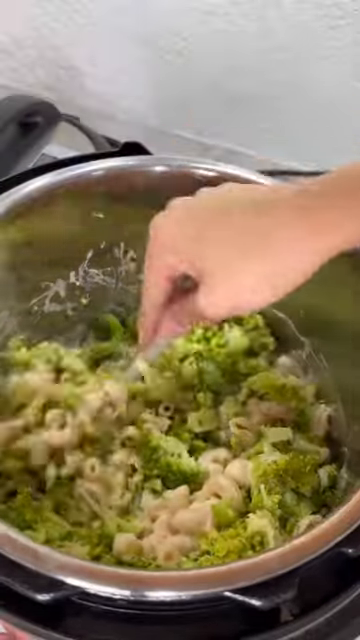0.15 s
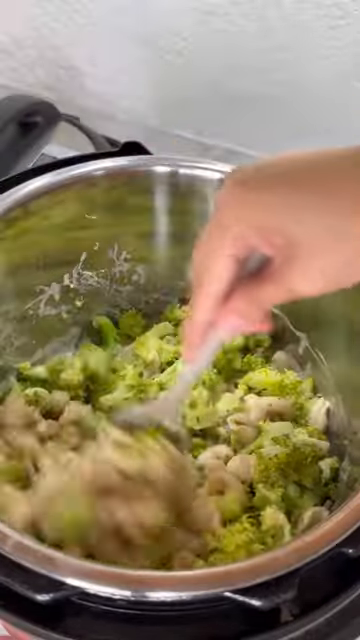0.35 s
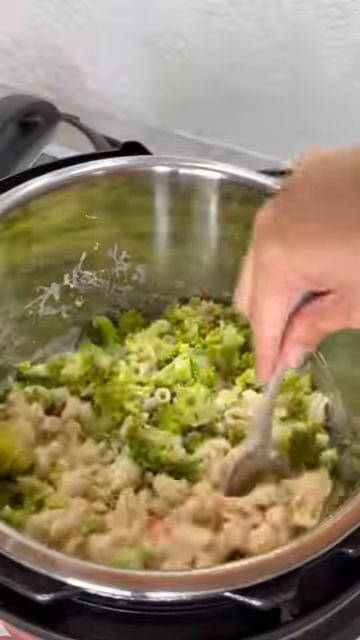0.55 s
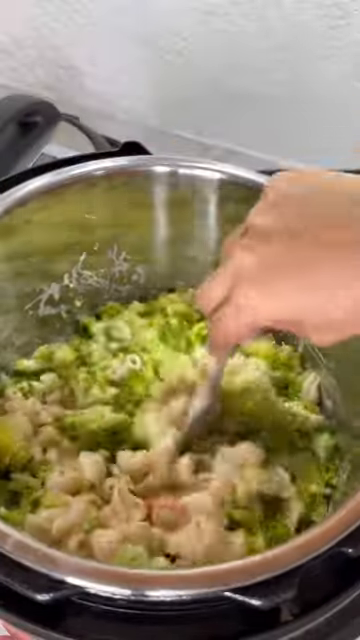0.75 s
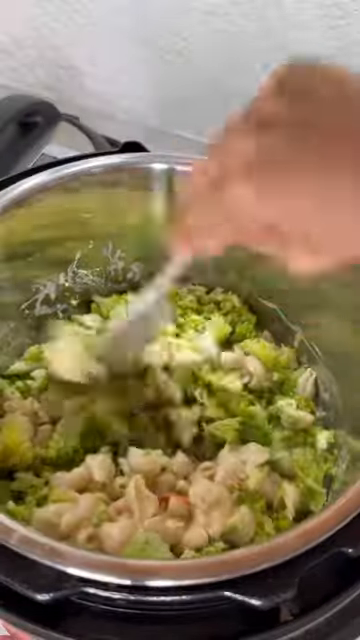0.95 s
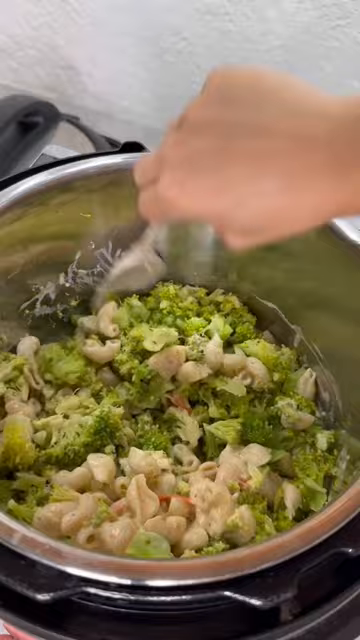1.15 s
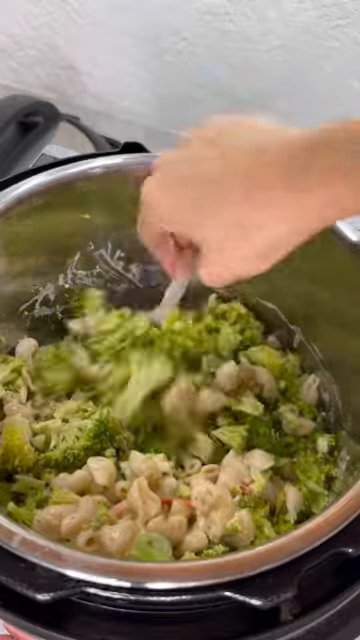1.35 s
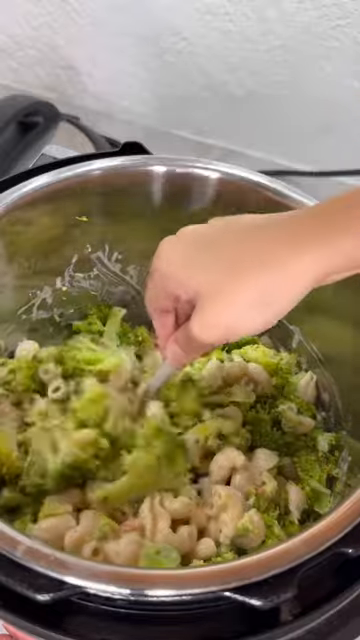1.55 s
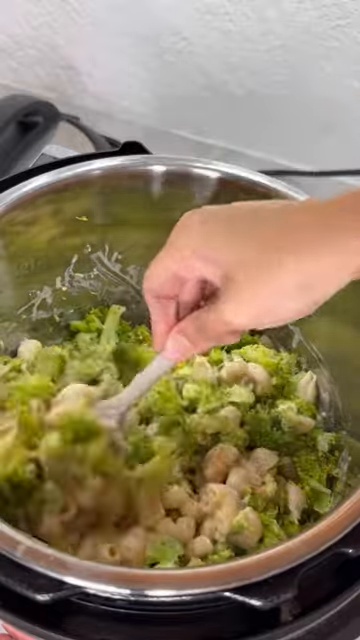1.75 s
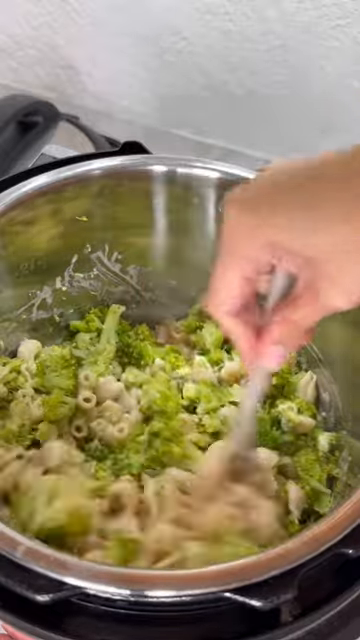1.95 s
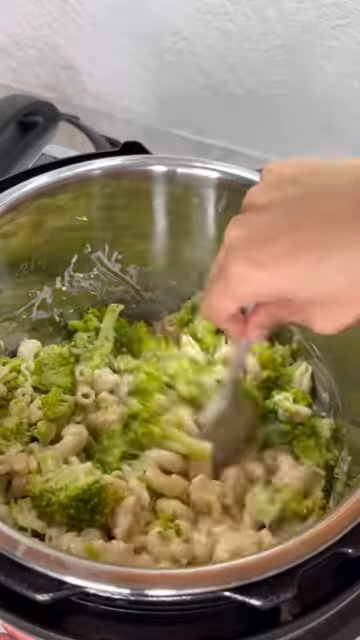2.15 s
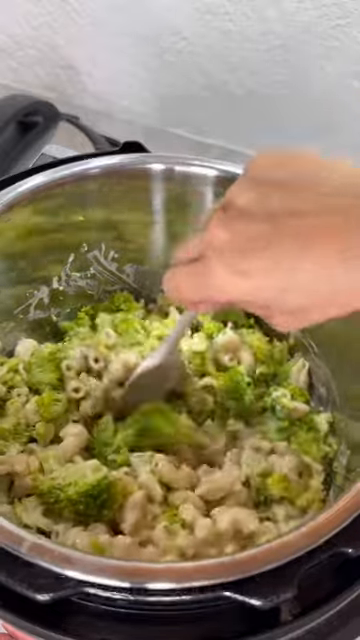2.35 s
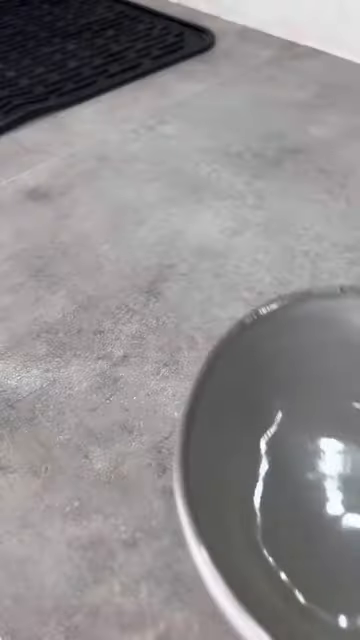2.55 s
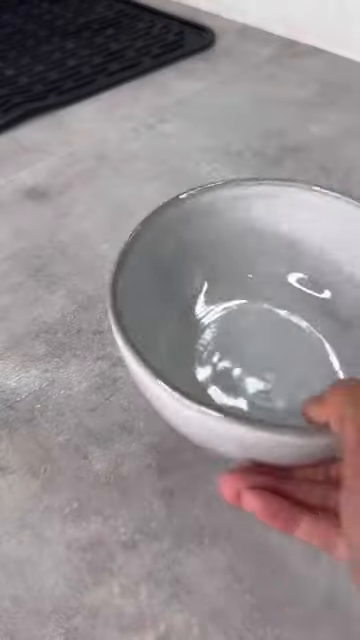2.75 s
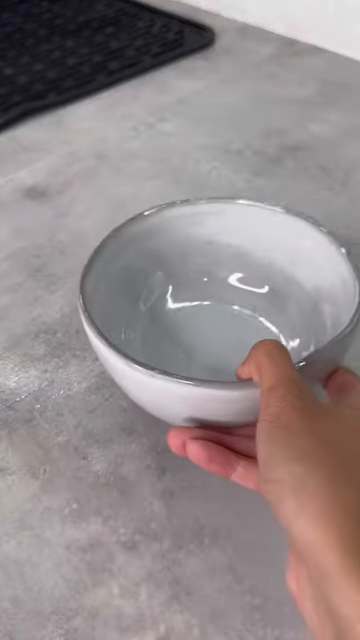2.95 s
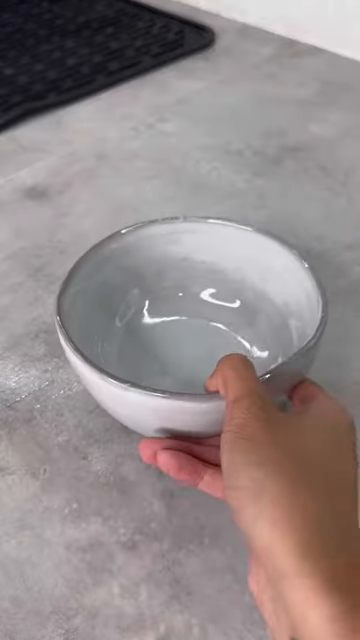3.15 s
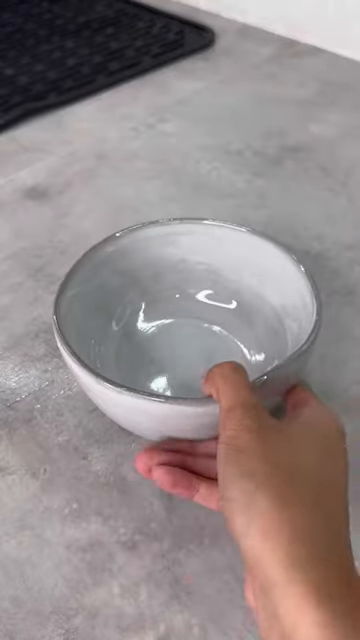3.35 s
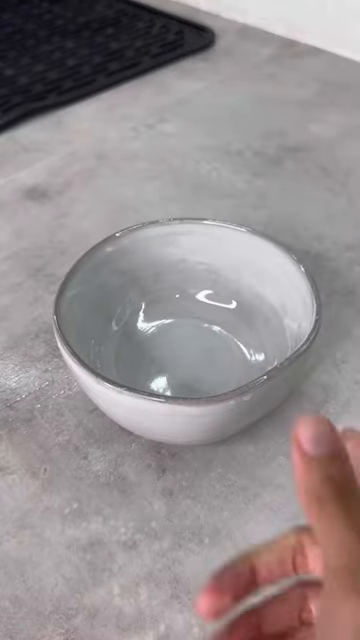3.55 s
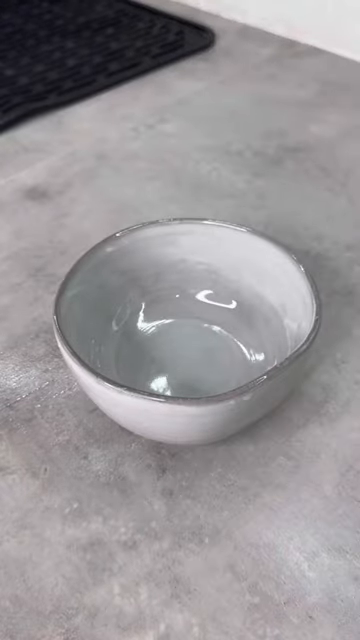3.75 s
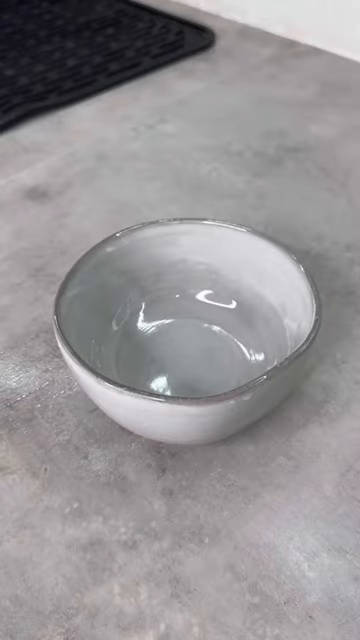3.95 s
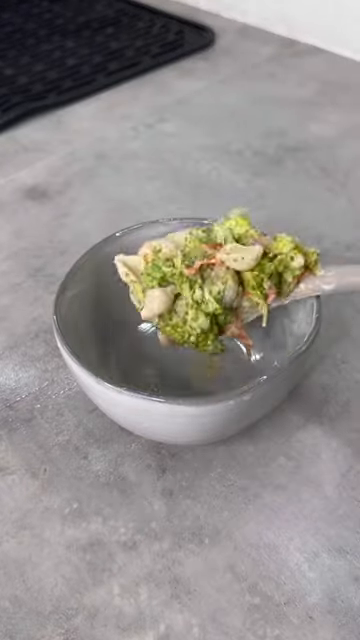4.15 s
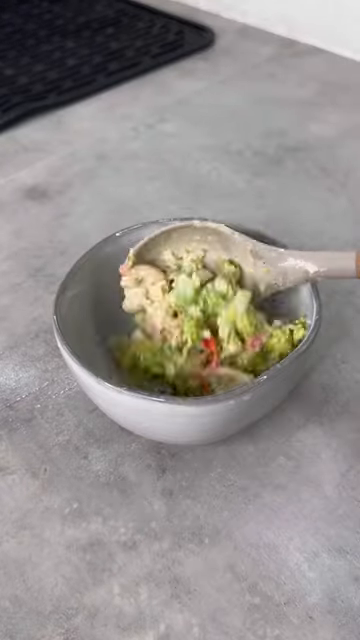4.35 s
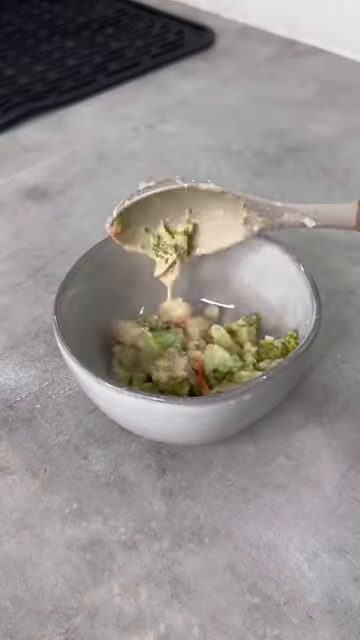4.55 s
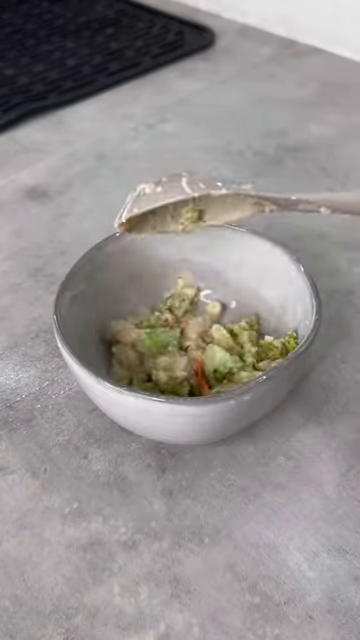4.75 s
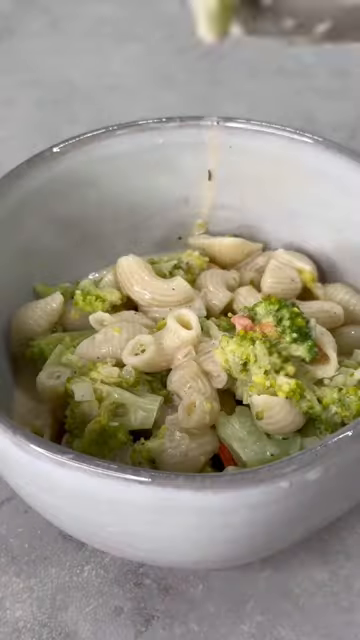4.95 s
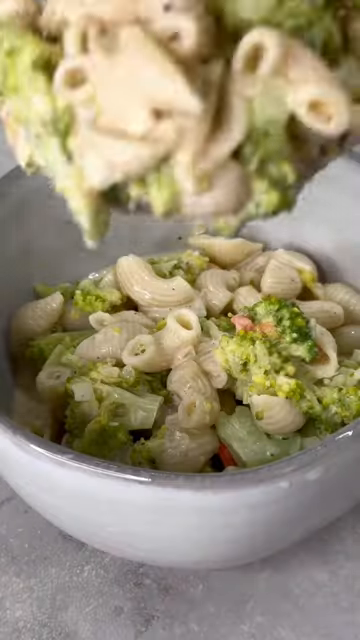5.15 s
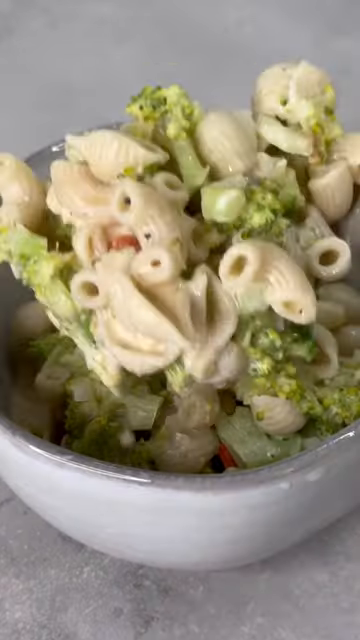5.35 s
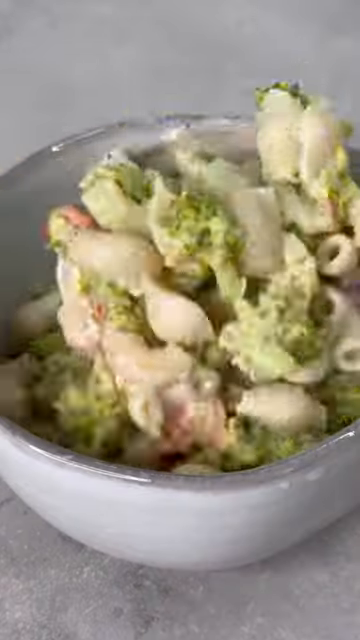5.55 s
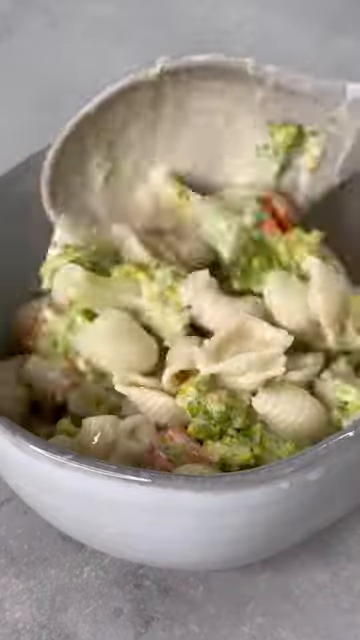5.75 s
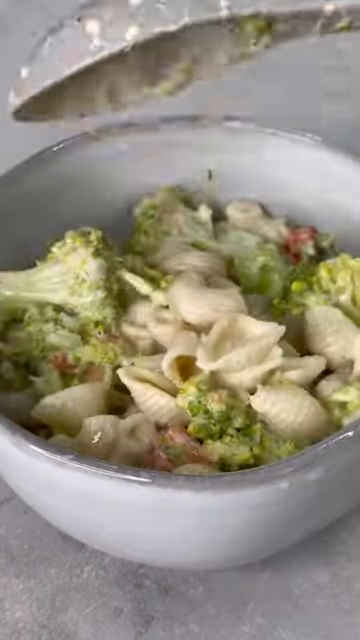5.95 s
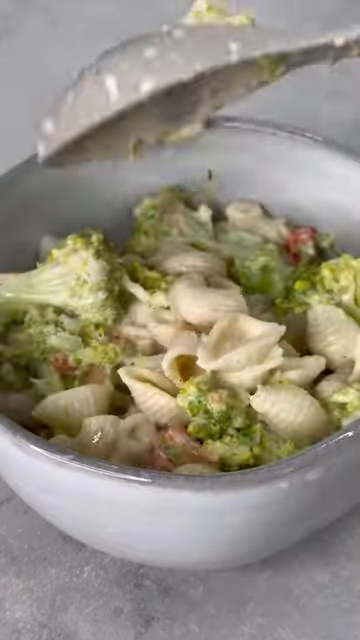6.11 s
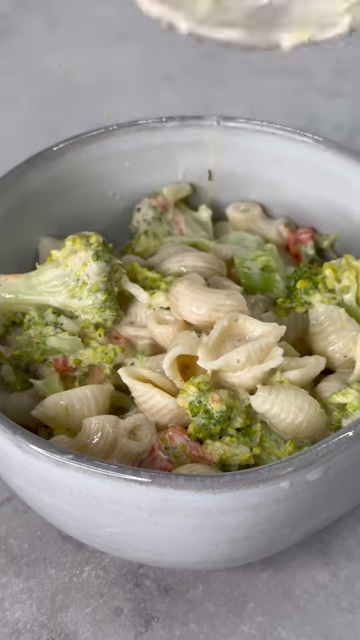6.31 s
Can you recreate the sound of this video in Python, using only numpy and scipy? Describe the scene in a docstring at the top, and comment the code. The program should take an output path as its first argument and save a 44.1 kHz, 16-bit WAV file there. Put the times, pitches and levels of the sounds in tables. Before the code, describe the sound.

Wet, sticky stirring in a metal pot, a loud knock of a bowl set down, then soft plops of pasta being served.

```python
"""Stirring and serving creamy pasta

Close to a steel pot in a kitchen, on a stereo microphone. A spoon turns the pasta: the sauce crackles
and pops, the spoon thumps the pot and skids on its wall. A ceramic bowl is set down on the counter
with a loud knock, then two spoonfuls plop softly into it."""
import sys
import numpy as np
from scipy import signal
from scipy.fft import rfft, irfft
from scipy.io import wavfile

SR = 44100
rng = np.random.default_rng(int(sys.argv[2]) if len(sys.argv) > 2 else 0)


def dump(signal):
    """Clip the signal to [-1, 1] and save it as 16-bit WAV at the path in sys.argv[1]."""
    limited = np.clip(np.atleast_2d(signal).T, -1, 1)
    pcm = np.round(limited * 32767).astype(np.int16)
    wavfile.write(sys.argv[1], SR, pcm)


N = 285674
TIME = np.arange(N) / SR
CUTOFF_HZ = 16200

# The spoon pushing through the pot. Each row: hardest moment in seconds, relative squelch and fizz
# levels in dB, swell and fade in seconds.
PUSHES = [(0.03, -64, -67.5, 0.2, 0.29), (0.39, -72, -73.5, 0.1, 0.09), (0.8, -57.5, -64, 0.21, 0.056),
          (1.16, -66.5, -72, 0.052, 0.068), (1.38, -65, -72.5, 0.11, 0.18), (1.89, -68.5, -69, 0.32, 0.38),
          (2.17, -56, -62.5, 0.082, 0.074), (2.47, -76, -79, 0.21, 0.0083)]
# Pasta sliding off the spoon and settling in the bowl. Rows as in PUSHES.
SPOONFULS = [(4.3, -64, -60, 0.033, 0.061), (4.4, -63, -66, 0.079, 0.12), (5.38, -69.5, -61, 0.031, 0.037),
             (5.52, -64.5, -67, 0.034, 0.063), (5.73, -73, -68.5, 0.093, 0.24)]
# Larger air pockets opening in the sauce. Each row: start in seconds, relative level in dB, pitch in Hz,
# swell in cycles, relative spray level in dB.
AIR_POCKETS = [(0.019, -48, 4380, 4.7, -60), (0.027, -50.5, 5670, 2.37, -53), (0.095, -53, 3200, 2.2, -73),
               (0.144, -48, 3730, 3.2, -56), (0.2751, -40, 1416, 1.4, -68), (0.282, -38, 5170, 0.64, -68),
               (0.32, -46.5, 1800, 0.48, -82), (0.349, -54, 8000, 0.7, -58),
               (0.4123, -41.5, 3400, 1.3, -62), (0.4682, -42.5, 1360, 1.36, -65.5),
               (0.5066, -47.5, 2354, 2.23, -65), (0.524, -43, 3680, 0.86, -74),
               (0.549, -44.5, 1880, 0.81, -80), (0.564, -50, 5520, 4.4, -53.5),
               (0.6226, -28.5, 2880, 1.3, -60), (0.6583, -39.5, 2490, 1.4, -53),
               (0.7205, -28.5, 2020, 0.43, -46.5), (0.7538, -42, 3330, 0.8, -56),
               (0.7715, -28, 3610, 0.6, -49), (0.922, -41, 9250, 1.3, -68), (1.154, -44, 2810, 3.2, -55),
               (1.2502, -46.5, 2110, 0.48, -78), (1.2884, -35.5, 3040, 0.82, -53.5),
               (1.2958, -32.5, 5200, 0.65, -64), (1.307, -41.5, 2300, 0.85, -63),
               (1.4315, -41, 2200, 0.62, -76), (1.452, -40, 1970, 0.86, -79), (1.506, -48, 3000, 0.89, -69),
               (1.5518, -47.5, 2450, 1.12, -72), (1.6339, -28.5, 1700, 0.43, -58),
               (1.6933, -41, 1860, 1.2, -52), (1.7427, -41.5, 9980, 3.8, -68),
               (1.783, -42.5, 3070, 1.4, -60), (1.819, -45, 2940, 1.2, -70), (1.8555, -47, 3960, 1.6, -69),
               (2.103, -40.5, 3200, 0.54, -66), (2.1442, -34, 3360, 2.4, -61),
               (2.1713, -43.5, 3640, 1.4, -59), (2.223, -45, 1960, 1.2, -62.5),
               (2.251, -47.5, 3230, 1.07, -58.5), (2.314, -43, 2270, 1.3, -60),
               (2.4505, -49.5, 3450, 2.7, -79), (2.4888, -45, 3100, 1.7, -60.5),
               (4.2426, -58.5, 2810, 4.3, -82), (4.2845, -23, 9530, 2, -53.5),
               (4.3569, -36, 8950, 1.22, -72), (4.4398, -45.5, 3152, 2, -76),
               (4.5216, -41.5, 1640, 1.3, -67), (4.5569, -54.5, 3820, 1.4, -68),
               (4.683, -49, 2000, 0.61, -70), (4.69, -27.5, 14380, 5, -64),
               (4.6907, -27.5, 1480, 0.29, -68), (4.6927, -45, 5080, 3.9, -76),
               (4.709, -43, 5780, 2.8, -67), (5.288, -52, 3735, 2.8, -79), (5.4292, -56.5, 2225, 1.5, -74),
               (5.4866, -52.5, 1760, 0.98, -62.5), (5.528, -54, 3500, 2, -73),
               (5.5422, -50, 2485, 1.7, -71), (5.554, -52.5, 5770, 1.8, -62.5),
               (5.6065, -53, 4700, 2.6, -70), (5.64, -45, 2506, 2.1, -72), (5.722, -50, 6000, 1.16, -60.5),
               (5.8335, -48.5, 4200, 2.3, -62), (5.6525, -39.5, 14000, 2.4, -58),
               (5.8843, -33.5, 13840, 1.8, -63.5)]
# Modes of the glazed bowl. Each row: pitch in Hz, level in dB, T60 in seconds.
BOWL_MODES = [(1083, -29, .75), (1182, -25.5, .4), (1275, -19.5, 0.3), (4540, -42, .45), (5280, -26, 0.2),
              (6070, -27, 0.15), (7250, -32.5, 0.22)]


def from_db(db):
    """Decibels to gain."""
    return 10 ** (np.asarray(db) / 20)


def unit_rms(x):
    """Scale to unit power."""
    return x / np.sqrt(np.mean(x ** 2) + 1e-20)


def at_hz(points, hz):
    """Read a curve on a log-frequency axis."""
    freqs, values = np.transpose(points)
    return np.interp(np.log(np.maximum(hz, 1)), np.log(freqs), values)


def colour(x, spectrum):
    """Shape a signal by a spectrum in dB."""
    gain = from_db(at_hz(spectrum, np.arange(N + 1) * SR / (2 * N)))
    return irfft(rfft(x, 2 * N) * gain)[..., :x.shape[-1]]


def add(out, start_s, sound):
    """Mix a sound in at its start time."""
    i = max(round(start_s * SR), 0)
    out[i:i + len(sound)] += sound[:N - i]


def ring(x, modes):
    """Drive damped modes: a unit click sets each one ringing at its level."""
    out = 0
    for k, (hz, db, t60) in enumerate(modes):
        radius, angle = from_db(-60 / (t60 * SR)), 2 * np.pi * hz / SR
        mode = signal.lfilter([0, np.sin(angle)], [1, -2 * radius * np.cos(angle), radius ** 2], x + 1e-18)
        out += (-1) ** k * from_db(db) * mode
    return out


def boom(modes, swell_cycles):
    """A struck plate: bending waves are slow in the bass, so lower modes take longer to swell."""
    t, out = TIME[:SR], 0
    for k, (hz, db, t60) in enumerate(modes):
        swell = 1 - np.exp(-(t * hz / swell_cycles) ** 2)
        out += (-1) ** k * swell * from_db(db - 60 * t / t60) * np.sin(2 * np.pi * hz * t)
    return out


def burst(low_hz, high_hz, decay_s):
    """A dying spurt of noise within a band."""
    t = TIME[:SR // 4]
    band = signal.butter(2, [low_hz, high_hz], "band", fs=SR, output="sos")
    spurt = rng.standard_normal(len(t)) * np.exp(-t / decay_s)
    return signal.sosfilt(band, spurt + 1e-18) * np.sqrt(SR / 2 / (high_hz - low_hz))


def bubble(hz, cycles, rise=0.033):
    """A cavity opens, rings a few cycles while its pitch rises, and collapses."""
    age = TIME[:SR // 16] * hz / cycles
    envelope = age ** 2 * np.exp(2 * (1 - age))
    return envelope * np.sin(2 * np.pi * cycles * age * (1 + rise * (age / 2 - 1)))


def movement(moves):
    """Each movement of the pasta swells and dies away: gains of squelch and fizz over time."""
    squelch, fizz = 0, 0
    for peak_s, squelch_db, fizz_db, swell_s, fade_s in moves:
        envelope = np.exp(np.minimum((TIME - peak_s) / swell_s, (peak_s - TIME) / fade_s))
        squelch = np.hypot(squelch, from_db(squelch_db) * envelope)
        fizz = np.hypot(fizz, from_db(fizz_db) * envelope)
    return squelch, fizz


def crackle(spectrum, per_s, spread_db, cycles, clump):
    """Countless small bubbles of random size and pitch burst in clumps."""
    pitches = np.geomspace(spectrum[0][0], min(spectrum[-1][0], CUTOFF_HZ), 24)
    clumps = np.exp(clump * np.interp(TIME, np.arange(512) / 70, rng.standard_normal(512)))
    born = rng.random(N) < per_s * clumps / np.mean(clumps) / SR
    sizes = born * from_db(spread_db * np.minimum(rng.exponential(1, N), 3)) * rng.choice([-1, 1], N)
    pitch_index, out = rng.integers(0, len(pitches), N), 0
    for k, hz in enumerate(pitches):
        grains = signal.oaconvolve(sizes * (pitch_index == k), bubble(hz, cycles)[:SR // 50])[:N]
        out += unit_rms(grains) * np.sqrt(hz) * from_db(at_hz(spectrum, hz))
    return unit_rms(out)


def sauce(moves, squelch_spectrum, squelch_db, fizz_db, per_s):
    """Sticky films tear wherever the pasta is moved: a coarse squelch and a fine fizz."""
    # Colour of the finest bubbles. Each row: frequency in Hz, level in dB.
    fizz_spectrum = [(3000, -23.5), (4500, -5), (6000, 1.5), (8000, 0), (10000, 6), (12500, -4),
                     (15500, -1)]
    squelch_gain, fizz_gain = movement(moves)
    squelch = crackle(squelch_spectrum, per_s, spread_db=3.0, cycles=3.2, clump=.45)
    fizz = crackle(fizz_spectrum, per_s, spread_db=5.0, cycles=2.5, clump=.8)
    return squelch_gain * from_db(squelch_db) * squelch + fizz_gain * from_db(fizz_db) * fizz


def small_pockets(moves, over_squelch_db, knee_db):
    """Small pockets open at random, louder the harder the pasta is pushed; rows as in AIR_POCKETS."""
    median_gap_s, median_hz, spread_octaves = 1 / 36, 3200, 0.62
    spread_db, spray_db = 5, -16.5
    swell_s = 0.00064  # the same for all, so high ones ring more cycles
    squelch, _ = movement(moves)
    gap, size, pitch = np.clip(rng.standard_normal((400, 3)), -2, 2).T
    starts = np.cumsum(np.exp(.5 * gap)) * median_gap_s
    squelch_db = 20 * np.log10(np.interp(starts, TIME, squelch) + 1e-18)
    db = np.minimum(squelch_db + over_squelch_db, knee_db) + spread_db * size
    hz = median_hz * 2 ** (spread_octaves * pitch)
    heard = (starts < TIME[-1]) & (db > -75)
    return list(np.transpose([starts, db, hz, hz * swell_s, db + spray_db])[heard])


def pops(pop_db, spray_db, spray_s, tear_db, lowest_hz):
    """Air pockets snap open and throw off a little spray; smaller ones tear just before and after."""
    out = np.zeros(N)
    in_pot = small_pockets(PUSHES, over_squelch_db=10, knee_db=-58)
    in_bowl = small_pockets(SPOONFULS, over_squelch_db=8.5, knee_db=-50)
    for start, db, hz, cycles, fine_db in AIR_POCKETS + in_pot + in_bowl:
        add(out, start, from_db(db + pop_db) * bubble(hz, max(cycles, .5)))
        add(out, start, from_db(fine_db + spray_db) * burst(4100, 12500, spray_s))
        for when, size, pitch in rng.uniform(-1, 1, (5, 3)):
            tear = bubble(min(hz * 1.5 ** pitch, CUTOFF_HZ), cycles=1.2)
            add(out, start + 0.00091 + 0.0083 * when, from_db(db + tear_db + 4 * size) * tear)
    # cavities this small radiate no bass
    return signal.sosfilt(signal.butter(4, lowest_hz, "high", fs=SR, output="sos"), out)


def pot(nudge, murmur_db, thud_db):
    """The pot rings when the spoon pushes against it, and murmurs while the pasta slides round in it."""
    # From hollow thump to faint wall ring. Each row: pitch in Hz, level in dB, T60 in seconds.
    pot_modes = [(205, -9, .09), (243, 0, .21), (259, -6, .13), (334, -16, .11), (470, -16, .06),
                 (538, -20, .28), (768, -32, .33), (910, -32, .38), (991, -31, .38), (1297, -34, .33),
                 (1490, -34, .28), (1660, -33, .28), (1830, -37, .36), (2285, -35, .36), (2422, -35, .36),
                 (2830, -35, .28), (3290, -37, .3)]
    # The spoon pushing the pot. Each row: start in seconds, pot and counter levels in dB.
    thumps = [(0.031, -45, -49), (0.811, -29, -42.5), (1.082, -51, -56.5), (1.3749, -34.5, -41),
              (1.3826, -28.5, -44), (2.258, -44.5, -45.5)]
    effort, _ = movement(PUSHES)
    stirring = (effort / effort.max()) ** 0.7
    damped_modes = [(hz, db, t60 / 3) for hz, db, t60 in pot_modes]
    out = from_db(murmur_db) * stirring * unit_rms(ring(rng.standard_normal(N), damped_modes))
    body = boom(pot_modes, swell_cycles=0.35)
    for start, pot_db, counter_db in thumps:
        add(out, start, from_db(pot_db) * body + from_db(counter_db) * nudge)
        add(out, start, from_db(pot_db + thud_db) * burst(280, 553, decay_s=0.008))
    return out


def slides(width):
    """Spoon, pasta and fingers slide over surfaces, and once something bumps the counter: bands of noise that
    swell, glide and fade."""
    # From wet smears to dry swishes, with one low, dull bump on the counter. Each row: start and end in
    # seconds, level in dB, centre in Hz, # ratio of last pitch to first.
    strokes = [(0.229, 0.278, -62.5, 4815, 1.13), (0.463, 0.519, -62, 1630, 1.2),
               (2.009, 2.052, -59, 1214, 0.79), (2.373, 2.487, -66.5, 717, 0.7),
               (2.604, 3.053, -87.5, 1386, 1.1), (2.735, 2.788, -58.5, 173, 0.77),
               (3.867, 4.031, -72.5, 8050, 1.1), (4.029, 4.14, -65, 349.5, 0.89),
               (5.022, 5.094, -78.5, 8950, 1.2), (5.525, 5.562, -72, 2309, 0.6),
               (6.119, 6.264, -75.5, 6740, 1.2)]
    out = np.zeros(N)
    for start, end, db, hz, glide in strokes:
        progress = np.linspace(0, 1, round((end - start) * SR))
        carrier = np.exp(2j * np.pi * np.cumsum(hz * glide ** (progress - .5)) / SR)
        lowpass = signal.butter(2, np.clip(width * hz, 20, 5000), fs=SR, output="sos")
        noise = signal.sosfilt(lowpass, rng.standard_normal((2, SR // 2)))[:, -len(progress):]
        band = unit_rms(noise[0] * carrier.real + noise[1] * carrier.imag)
        swell = np.sqrt(np.abs(np.sin(np.pi * progress)))
        add(out, start, from_db(db) * band * swell)
    return out


def skids(ring_db, slips_per_s, grit_db):
    """The spoon touches the steel and chatters along it for a moment, grinding on the food in between."""
    # Each row: start in seconds, relative level in dB, bright rasp in dB, chatter decay in seconds.
    touches = [(0.8027, -27.5, -37.5, 0.0076), (1.001, -55.5, -65, 0.016), (1.3685, -34.5, -53.5, 0.014),
               (1.8815, -32.5, -51.5, 0.0039), (2.13, -50, -56, 0.012), (2.2077, -41.5, -40.5, 0.0017)]
    # Steel wall damped by the food. Each row: pitch in Hz, level in dB, T60 in seconds.
    wall_modes = [(1030, -17, 0.19), (1460, -10, 0.042), (2510, -7, 0.017), (2820, -4.5, 0.041),
                  (3046, 1.5, 0.011), (3500, -8, 0.035), (4020, -3.5, 0.024), (5180, -21, 0.015),
                  (5940, -20, 0.074)]
    slips, grinding, t = np.zeros(N), np.zeros(N), TIME[:SR // 8]
    for start, db, rasp_db, decay_s in touches:
        slipping = rng.random(len(t)) < slips_per_s / SR
        chatter = slipping * rng.uniform(-0.33, 1, len(t)) * np.exp(-t / decay_s)
        chatter[0] = 1.0  # first contact
        add(slips, start, from_db(db + ring_db) * chatter)
        add(grinding, start, from_db(rasp_db) * burst(5900, 8400, decay_s))
        add(grinding, start, from_db(db + grit_db) * burst(690, 3900, 2 * decay_s))
    return ring(slips, wall_modes) + grinding


def knocks(clack_s, rattle_db, rattle_s):
    """The bowl's hard foot: a short clack and a duller rattle, over the boom of the counter."""
    # The foot's edge touches, the bowl drops flat, rocks and settles. Each row: start in seconds,
    # boom and clack levels in dB.
    contacts = [(3.1741, -49.5, -35), (3.1835, -6.5, -11), (3.2159, -21.5, -28.5), (3.2485, -41, -49),
                (3.323, -45.5, -63)]
    # The counter with the bowl on it. Each row: pitch in Hz, level in dB, T60 in seconds.
    counter_modes = [(63, -20, 0.32), (92.4, 4, 0.26), (119, -3, .16), (160, -11, 0.2), (189, -4.5, 0.2),
                     (221, -13, 0.15), (305, -12.5, 0.23), (345, -14, 0.25), (374.6, 2, 0.075),
                     (413, -8, 0.12), (472, -8, 0.09), (560, -6.5, 0.07), (640, -22, 0.2),
                     (741.4, -18, .12), (926, -26, 0.22), (989, -21, 0.14), (1080, -8, 0.05),
                     (1338, -14, 0.05), (1770, -23, 0.07), (3080, -27, 0.04)]
    # Dense upper ring of bowl and counter, and the rattle after it. Each row: frequency in Hz, level in dB.
    clack_spectrum = [(90, -15), (220, -3), (450, 8.5), (1100, -3), (1700, -3.5), (2200, -16), (3000, -16),
                      (4500, -27.5), (7500, -30), (10000, -35), (15000, -54)]
    rattle_spectrum = [(120, -8.5), (220, 10), (400, 2.5), (600, -5.5), (850, -4), (1300, -14.5),
                       (2200, -22), (3200, -29.5), (4500, -36.5), (7500, -35), (10000, -46), (15000, -57.5)]
    out, t = np.zeros(N), TIME[:SR]
    body = boom(counter_modes, swell_cycles=2.1)
    clack_noise = unit_rms(colour(rng.standard_normal(N), clack_spectrum))
    rattle_noise = unit_rms(colour(rng.standard_normal(N), rattle_spectrum))
    attack = 1 - np.exp(-t / 0.00072)
    for k, (start, body_db, clack_db) in enumerate(contacts):
        stretch = slice(k * SR, (k + 1) * SR)
        clack = clack_noise[stretch] * np.exp(-t / clack_s)
        rattle = from_db(rattle_db) * rattle_noise[stretch] * np.exp(-t / rattle_s)
        add(out, start, from_db(body_db) * body + from_db(clack_db) * (clack + rattle) * attack)
    return out


def bowl_ring(set_down_s, set_down_db, pop_db):
    """The bowl sings faintly when set down and when sauce snaps inside it; deep pops shake it most."""
    taps = np.zeros(N)
    add(taps, set_down_s, from_db([set_down_db]))
    for start, db, hz, *_ in AIR_POCKETS:
        if start > set_down_s:
            add(taps, start, from_db([db + pop_db]) * min(1, 1600 / hz))
    return ring(taps, BOWL_MODES)


def plops(nudge, splat_db, sag, sag_s):
    """Lumps land in the bowl with a dull splat and nudge the counter; the pitch sinks as they flatten."""
    # Each row: start in seconds, first pitch in Hz, plop and counter levels in dB, swell in seconds.
    lumps = [(4.031, 312.5, -57.5, -53.5, 0.01), (4.115, 250, -44, -38, 0.0067),
             (4.279, 373, -43, -38.5, 0.0083), (4.348, 306, -52.5, -44, 0.0094),
             (4.426, 251, -50.5, -46.5, 0.0055), (4.512, 302, -51.5, -46, 0.008),
             (4.695, 201, -58, -56.5, 0.009), (5.378, 162, -62, -54, 0.009),
             (5.56, 221, -43.5, -53.5, 0.015), (5.771, 233, -45, -53, 0.011)]
    out, t = np.zeros(N), TIME[:SR // 4]
    for start, hz, plop_db, counter_db, swell_s in lumps:
        pitch = hz * (1 - sag * (1 - np.exp(-t / sag_s)))
        envelope = t / swell_s * np.exp(1 - t / swell_s)
        plop = envelope * np.sin(2 * np.pi * np.cumsum(pitch) / SR)
        splat = from_db(splat_db) * burst(hz / 2, 0.89 * hz, decay_s=0.01)
        add(out, start, from_db(plop_db) * (plop + splat))
        add(out, start, from_db(counter_db) * nudge)
    return out


def vessel_echoes(x, echo_db, decay_s, width):
    """Close curved walls add a quick cluster of echoes, different on left and right."""
    # What the walls throw back. Each row: frequency in Hz, relative level in dB.
    wall_spectrum = [(100, -17.5), (400, -4.5), (1100, 2.5), (3000, -1.5), (8000, 1.5), (15000, -2)]
    t = TIME[:SR // 20]
    mid, side = colour(rng.standard_normal((2, len(t))), wall_spectrum)
    echoes = (mid + width * side * [[1], [-1]]) * np.exp(-t / decay_s) * (t > .0008)
    echoes *= from_db(echo_db) / np.sqrt(np.sum(echoes ** 2) / 2)
    return x + signal.oaconvolve(x[None], echoes, axes=1)[:, :N]


def kitchen_reverb(x, first_echo_s, cut_s):
    """Diffuse reverberation dies band by band; that of the stirring stops dead at cut_s."""
    # Its colour, and its side against its mid, narrow in the bass. Each row: frequency in Hz, level in dB.
    room_spectrum = [(60, -6.5), (200, -6), (500, 1.5), (1200, -13.5), (3000, -18.5), (8000, -13.5),
                     (11000, -19.5), (15000, -32)]
    side_spectrum = [(60, -26.5), (150, -17.5), (300, -12), (600, 3), (1200, 1), (12000, -7)]
    # Reverberation time. Each row: frequency in Hz, T60 in seconds.
    room_t60 = [(100, 0.34), (500, 0.36), (1500, 0.54), (5000, 0.51), (14000, 0.17)]
    t, tail = TIME[:SR * 2 // 3], 0
    edges = 55 * 2 ** np.arange(0, 8.6, .5)
    for low, high in zip(edges, edges[1:]):
        hz = np.sqrt(low * high)
        bandpass = signal.butter(2, [low, high], "band", fs=SR, output="sos")
        mid, side = signal.sosfilt(bandpass, rng.standard_normal((2, len(t))))
        fade = from_db(-60 * t / at_hz(room_t60, hz)) * (t > first_echo_s)
        band = (mid + from_db(at_hz(side_spectrum, hz)) * side * [[1], [-1]]) * fade
        gain = from_db(at_hz(room_spectrum, hz)) * np.sqrt((high - low) / (SR / 2) / len(t))
        tail += gain * unit_rms(band)
    before = TIME < cut_s
    return sum(part * signal.fftconvolve(x * part, tail, axes=1)[:, :N] for part in (before, ~before))


def noise_floor(level_db):
    """Low room rumble and faint hiss, with a thin electronic whine near 10 kHz."""
    # Its colour, and its side against its mid. Each row: frequency in Hz, relative level in dB.
    floor_spectrum = [(15, -40), (25, -18.5), (43, 4), (97, -4), (120, -16), (175, -12), (215, -15.5),
                      (309, -19.5), (394, -26), (531, -32.5), (1520, -39), (5000, -47.5), (9070, -51.5),
                      (10100, -38), (11900, -74.5), (16000, -49.5)]
    side_spectrum = [(30, -25), (100, -23), (250, -9.5), (600, 6.5), (2000, -12), (12000, -7.5)]
    mid, side = colour(rng.standard_normal((2, N)), floor_spectrum)
    return from_db(level_db) * unit_rms(mid + colour(side, side_spectrum) * [[1], [-1]])


def scene():
    """Wet sounds in the vessels, blows on the counter, the room round them; the close pot is drier."""
    # Colour of the squelch in the pot and in the bowl. Each row: frequency in Hz, level in dB.
    pot_squelch = [(350, -0.5), (750, -14.5), (1100, 5.5), (1800, -2), (3000, 1), (4200, -8), (6000, -21)]
    bowl_squelch = [(1000, -2), (1600, 1), (2100, 0), (2600, 4), (3200, -5), (4200, 0.5), (6000, -24)]
    stirred = sauce(PUSHES, pot_squelch, squelch_db=1.5, fizz_db=7.0, per_s=3000)
    served = sauce(SPOONFULS, bowl_squelch, squelch_db=-5.0, fizz_db=-1.0, per_s=2500)
    wet = stirred + served + from_db(-27) * ring(served, BOWL_MODES[:2])
    wet += pops(pop_db=1.5, spray_db=7.5, spray_s=0.0022, tear_db=-17.0, lowest_hz=900)
    wet += skids(ring_db=-11.5, slips_per_s=1600, grit_db=-14.0)
    wet += slides(width=0.18)
    # soft contacts wake only the lowest modes of the counter
    nudge = boom([(90.5, 13.5, 0.23), (122.3, -1.0, 0.18), (161.2, 0.5, 0.2)], swell_cycles=2.28)
    blows = plops(nudge, splat_db=-1.5, sag=0.282, sag_s=0.025)
    blows += knocks(clack_s=0.0068, rattle_db=-7.5, rattle_s=0.042)
    blows += bowl_ring(set_down_s=3.1835, set_down_db=-31, pop_db=-14.0)
    near = vessel_echoes(wet, echo_db=-10.0, decay_s=.005, width=0.46)
    near += vessel_echoes(blows, echo_db=-18.5, decay_s=0.0035, width=0.98)
    steel = pot(nudge, murmur_db=-55, thud_db=-8.5)
    reverb = kitchen_reverb(near + from_db(-4) * steel, first_echo_s=0.004, cut_s=2.505)
    return near + steel + reverb + noise_floor(level_db=-56.0)


def record(dry):
    """The two microphone ports fall out of phase in the high treble; peaks are rounded, the top is cut."""
    port_hz, port_q, ceiling = 12500, 1.5, 1.1
    _, poles = signal.iirnotch(port_hz, port_q, fs=SR)
    right = signal.lfilter(poles[::-1], poles, dry[1])  # all-pass: only the phase turns
    rounded = ceiling * np.tanh(np.array([dry[0], right]) / ceiling)
    return signal.sosfilt(signal.ellip(10, .3, 80, CUTOFF_HZ, fs=SR, output="sos"), rounded)


dry = scene()
out = record(dry)
dump(out)
```